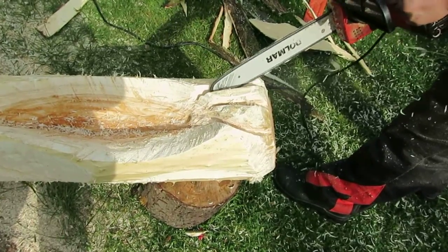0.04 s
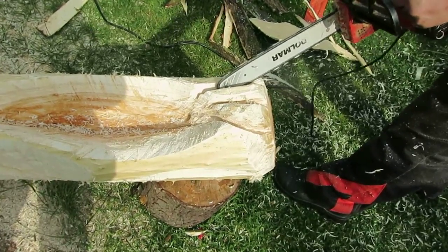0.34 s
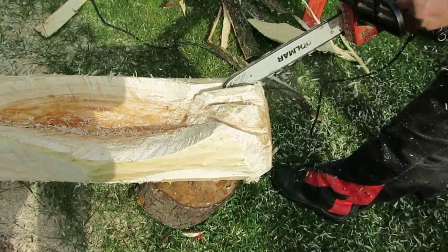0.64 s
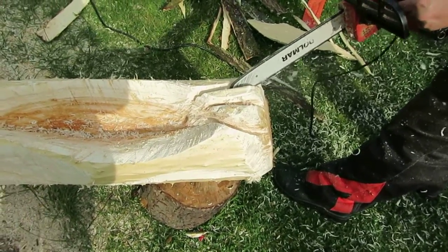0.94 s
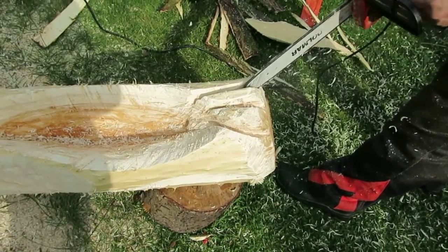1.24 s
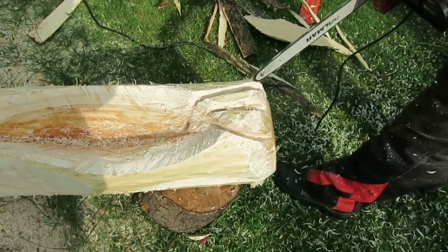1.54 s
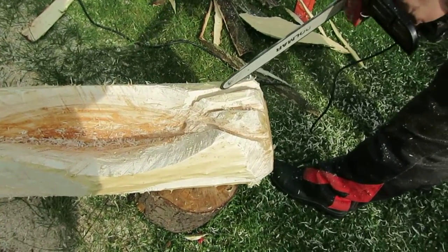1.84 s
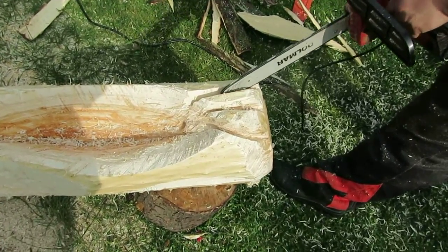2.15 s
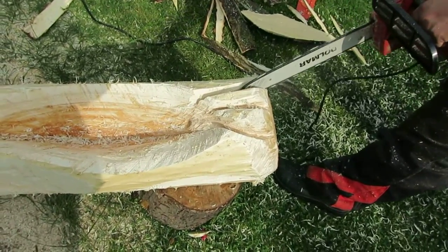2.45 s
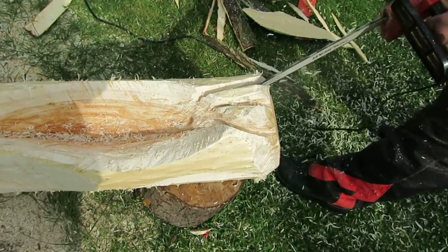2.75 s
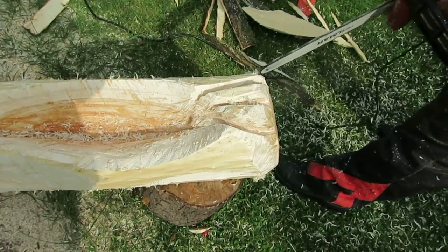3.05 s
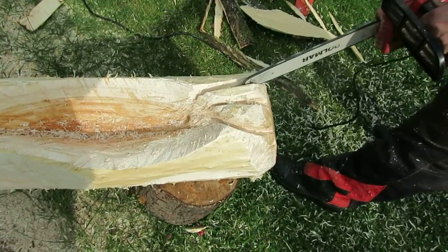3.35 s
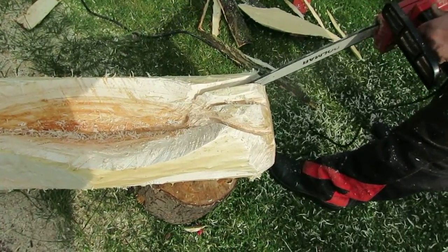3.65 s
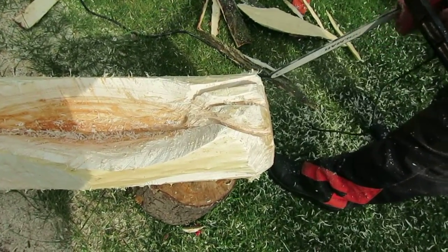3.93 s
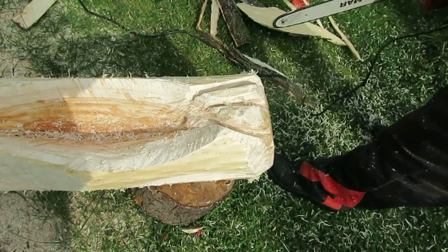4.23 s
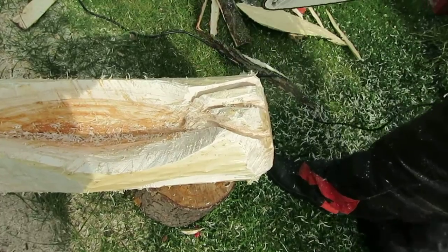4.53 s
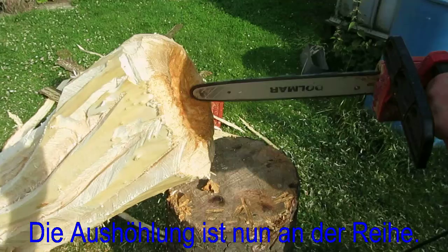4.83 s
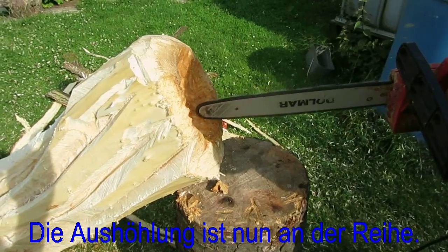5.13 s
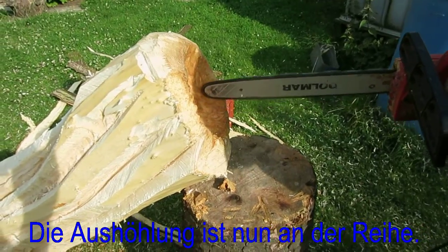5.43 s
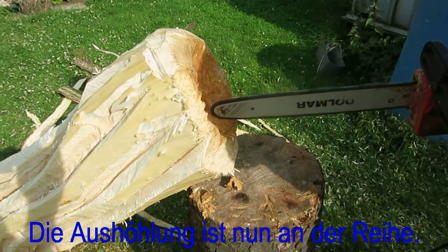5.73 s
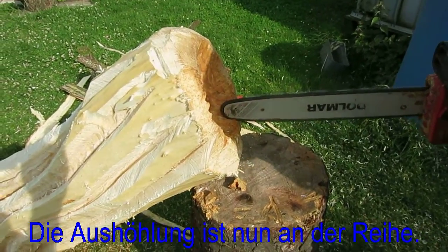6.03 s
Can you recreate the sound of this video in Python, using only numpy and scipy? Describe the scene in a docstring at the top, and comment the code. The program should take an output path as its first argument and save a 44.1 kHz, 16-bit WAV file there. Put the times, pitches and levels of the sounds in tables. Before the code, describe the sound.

A corded chainsaw carves a log outdoors, heard from close by. The motor whines over the clatter of the chain and the bright rasp of cutters in wood, dipping in pitch on the deeper strokes. The trigger is released and the whine falls away. After a very short dead silence, the sawing returns suddenly, high and even in pitch.

```python
"""Electric chainsaw hollowing a log

On a lawn, close to the microphone, a corded saw's whine sags as the chain bites the side of a log.
Links clatter on the sprocket, the bar rings and the cutters rasp. The trigger is let go and the saw
runs down; after a short silence it is at full speed on the end grain."""
import sys
import numpy as np
from scipy import signal
from scipy.fft import rfft, irfft
from scipy.io import wavfile
from scipy.ndimage import uniform_filter1d

SR = 44100
rng = np.random.default_rng(int(sys.argv[2]) if len(sys.argv) > 2 else 0)


def log_audio(samples):
    """Write samples as a 16-bit WAV file to the path given in sys.argv[1]."""
    # one column per channel
    frames = np.atleast_2d(samples).T
    # limit to full scale, then quantise
    limited = np.clip(frames, -1, 1)
    pcm = np.round(limited * 32767).astype(np.int16)
    wavfile.write(sys.argv[1], SR, pcm)


N = 276943
TIME = np.arange(N) / SR
FAN_ORDER, LINKS_PER_TURN, GEAR = 4, 6, 16 / 55
TAUT_SPEED = 400  # motor turns/s below which the chain hangs slack
USUAL_BITE_DB, SINK_S = -19, .07  # SINK_S: time to sink into the groove or lift out
SILENCE_S, BAND_LIMIT_HZ = (4.685, 4.958), 12350

# motor sagging in each side stroke, running down, barely loaded on the end grain: t/s, speed/(turns/s)
SPEED_SIDE = [(0.0, 434.1), (0.44, 407.6), (0.6, 406.1), (1.32, 405.1), (1.65, 431.9), (1.84, 441.2),
              (2.11, 445.2), (2.36, 443.0), (2.53, 429.9), (2.79, 419.5), (2.84, 421.3), (3.08, 437.6),
              (3.26, 443.3), (3.46, 440.3), (3.59, 430.2), (3.79, 429.9), (3.92, 436.0), (3.94, 432.1)]
SPEED_COAST = [(4.11, 367), (4.32, 301), (4.52, 223), (4.69, 145)]
SPEED_END = [(4.96, 442.7), (5.15, 442.7), (5.5, 445.5), (5.7, 442.5), (6.0, 447.2), (6.28, 449.7)]
# how hard the cutters bite on the side and on the end grain: t/s, bite/dB
BITE_SIDE = [(0.0, -19), (0.64, -20.5), (0.69, -19.5), (1.31, -20), (1.46, -23), (1.63, -23), (2.02, -18.5),
             (2.78, -21.5), (2.82, -18.5), (2.85, -25), (2.95, -24.5), (3.25, -20.5), (3.62, -20),
             (3.64, -21.5), (3.82, -22), (3.84, -24.5), (3.94, -23)]
BITE_END = [(4.98, -17), (5.17, -18), (6.02, -17.5), (6.062, -15.5), (6.104, -19), (6.23, -18)]
# the chain runs deep in the wood: start/s, end/s, relative depth
GROOVES = [(.39, 1.37, 2.2), (2.2, 2.65, 0.34), (3.44, 3.77, 0.6)]
# fan whine: t/s, level/dB
FAN_LEVEL = [(0, -25.5), (.5, -29), (1.3, -30.5), (1.72, -26.5), (2.4, -31.5), (2.6, -33.5), (3.25, -29.5),
             (3.6, -32.5), (4.02, -28.5), (4.11, -33.5), (4.69, -41.5), (4.96, -27.5), (5.55, -28.5),
             (6.1, -25.5)]
# weaker motor tones: multiple of shaft speed, level/dB against the fan
SHAFT_TONES = [(1, -25.5), (2, -14), (6, -22.5), (8, -14.5)]
# how strongly the saw radiates a link tone: f/Hz, level/dB
LINK_RESPONSE = [(250, -46), (350, -38), (470, -39), (525, -36), (600, -41), (700, -31.5), (735, -41),
                 (775, -36.5), (900, -39.5), (1280, -43), (1420, -33.5), (1560, -29.5), (1700, -29.5),
                 (1850, -45), (2300, -39.5)]
# link tones: harmonic, change/dB per groove depth, change/dB on end grain, change/dB per speed halving
LINK_TONES = [(1, -8.5, 9.5, -7.5), (2, -16.5, -2, -1), (3, 1.5, -5, -0.5)]
# weaker chain tones against the rasp: multiple of sprocket speed, side level/dB, end-grain level/dB
SPROCKET_TONES = [(3.008, -30.5, -28), (5.02, -26.5, -23), (7.41, -23, -32), (9.07, -23.5, -32),
                  (10.95, -21, -18), (12.87, -21, -24), (15, -21, -27), (24.37, -21.5, -19.5),
                  (30.03, -23, -17.5), (35.6, -20.5, -12.5), (41.7, -26.5, -25.5)]
# noise under load: side level/dB, end-grain level/dB, then change/dB per dB of bite,
# per groove depth and per speed halving
HOUSING_LAW = (-31.5, -30.5, .5, -0.1, -5.5)
BAR_LAW = (-32.5, -34, -0.05, -0.5, -2)
RASP_LAW = (-22.5, -24, 0.77, 0.2, -9.5)
HISS_LAW = (-19.5, -20, 1.08, 0.1, -10.5)
# noise spectra at the microphone, saw on the side or the end grain: f/Hz, relative level/dB
HOUSING_SIDE = [(20, -11), (100, -13), (220, -11), (350, -9.5), (480, -10), (640, -3.5), (760, -9.5),
                (910, -0.5), (1150, -4.5), (1330, -4.5), (1600, -23), (2500, -56.5)]
HOUSING_END = [(20, -9), (100, -7), (300, -6.5), (480, -4), (680, 1), (790, -2), (900, 0.5), (1200, 0),
               (1350, -0.5), (1600, -11), (2500, -60)]
RASP_SIDE = [(900, -51.5), (1600, -9), (2000, -3), (2400, -3), (3300, -6), (4200, -3), (4900, -1),
             (5700, -1), (6500, -0.5), (7500, -5.5), (10000, -45)]
RASP_END = [(900, -50), (1600, -8.5), (2000, -4), (2400, -2), (3200, -3.5), (4200, -2), (4900, 0.5),
            (5700, -0.5), (6500, 0), (7500, -14), (10000, -45)]
HISS_SPECTRUM = [(4000, -49.5), (6000, -17.5), (6900, -4.5), (7600, -0.5), (8600, 1), (10200, 1),
                 (10800, -2.5), (11300, -7), (11800, -18), (12300, -26.5), (14000, -66.5)]
# guide bar modes: f/Hz, width/Hz, relative level/dB
BAR_MODES = [(1444, 150, -1), (1570, 300, 0.5), (1762, 140, -2)]
# passing resonances of housing, bar and log: start/s, end/s, f/Hz, width/Hz, level/dB
SAW_AND_WOOD_RINGS = [(0, 1.352, 966, 260, -37), (0, 0.296, 920, 150, -42), (0, 1.35, 301, 60, -49),
                      (0.179, 0.233, 948, 50, -29.5), (0.327, 0.478, 957, 180, -36),
                      (1.447, 2.5, 643, 70, -42.5), (1.596, 2.198, 1545, 200, -32.5),
                      (2.68, 2.75, 926, 60, -33.5), (2.66, 2.86, 1490, 90, -32),
                      (2.7, 2.86, 2360, 200, -38), (3.259, 3.577, 5200, 1600, -27),
                      (3.45, 3.802, 320, 70, -46.5), (3.55, 4.099, 680, 160, -44),
                      (3.87, 3.94, 3770, 60, -36), (5.68, 6.28, 4930, 900, -30.5)]
# spells of chatter: start/s, end/s, gain/dB, voice (0 squeal, 1 knock, 2 growl)
CHATTER_SPELLS = [(0.288, 1.35, -51, 0), (0.253, .9, -47, 2), (2.17, 2.515, -36.5, 2),
                  (2.49, 2.803, -40, 2), (2.68, 2.79, -38.5, 0), (2.775, 2.86, -28, 0),
                  (3.35, 3.62, -58, 2), (3.61, 3.754, -36.5, 1)]
# chatter partials: multiple of sprocket speed, relative level/dB in a squeal, a knock, a growl
CHATTER_TONES = [(2.494, -31.5, -2.5, -18.5), (2.986, -20, -10.5, -6), (5.6, -32, -1.5, -33),
                 (7.39, -13, -19, -9.5), (8.97, -21, 0, 0), (12.04, 5, 2, -20), (15, -15, 4.5, -10),
                 (18.05, -8, 1, -7.5), (19.5, 0.5, 1, -10.5), (22.7, -18, 3, -23.5),
                 (24.2, -3.5, -2, -22.5), (36.3, -7, -11, -24)]
# a faint, thin high tone gliding upward: t/s, f/Hz, level/dB
HIGH_GLIDE = [(4.1, 8070, -52), (4.14, 8530, -30), (4.18, 9050, -31.5), (4.24, 9800, -34),
              (4.29, 10270, -55)]


def gain_of(db):
    """Decibels to a factor."""
    return 10 ** (np.asarray(db) / 20)


def unit_rms(x):
    """Scales to rms 1."""
    return x / np.sqrt(np.mean(x ** 2) + 1e-20)


def curves(rows):
    """Each column after the first as a curve over time."""
    times, *columns = np.transpose(rows)
    return [np.interp(TIME, times, column) for column in columns]


def shaped(x, spectrum):
    """Colours x with a spectrum, at rms 1."""
    hz, db = np.transpose(spectrum)
    bins_hz = np.fft.rfftfreq(N, 1 / SR)
    response = gain_of(np.interp(np.log(bins_hz + 1), np.log(hz), db))
    return unit_rms(irfft(rfft(x) * response, N))


def drift(rate_hz):
    """A random wander of rms 1."""
    knots = rng.standard_normal(N // 20)
    return unit_rms(np.interp(TIME * rate_hz, np.arange(len(knots)), knots))


def tone(turns, flutter_db):
    """A sine on a running phase, with a fluttering level."""
    sine = np.sqrt(2) * np.sin(2 * np.pi * (turns + rng.random()))
    return sine * unit_rms(gain_of(flutter_db * drift(45)))


def swell(start, end):
    """A rounded arch between two times."""
    progress = np.clip((TIME - start) / (end - start), 0, 1)
    return 2 * np.sqrt(progress * (1 - progress))


def resonate(x, hz, width):
    """A resonance applied twice, for steep skirts."""
    b, a = signal.iirpeak(hz, hz / width, fs=SR)
    return signal.lfilter(b, a, signal.lfilter(b, a, x))


def impacts(links, spread_db, decay, steady):
    """Each link gives a burst of its own size (decay in link periods) over steady sliding noise."""
    link_index = (links - links.min() // 1).astype(int)
    sizes = gain_of(spread_db * np.clip(rng.standard_normal(N // 20), -2.3, 2.3))
    bursts = unit_rms(sizes[link_index] * np.exp(-(links % 1) / decay))
    return rng.standard_normal(N) * np.sqrt(bursts ** 2 + steady ** 2)


def motor(shaft):
    """The cooling fan whines over weaker shaft tones."""
    fan_db, = curves(FAN_LEVEL)
    weaker = sum(gain_of(db) * tone(order * shaft, flutter_db=1) for order, db in SHAFT_TONES)
    return gain_of(fan_db) * (tone(FAN_ORDER * shaft, flutter_db=.37) + weaker)


def link_tones(links, speed, end_grain, depth, halvings):
    """Links drop onto the sprocket in step; their tones swell as they pass the saw's resonances."""
    hz, db = np.transpose(LINK_RESPONSE)
    link_hz = LINKS_PER_TURN * GEAR * speed
    sound = np.zeros(N)
    for harmonic, groove_db, end_db, halving_db in LINK_TONES:
        radiated_db = np.interp(np.log(harmonic * link_hz), np.log(hz), db)
        change_db = groove_db * depth + end_db * end_grain + halving_db * halvings
        sound += gain_of(radiated_db + change_db) * tone(harmonic * links, flutter_db=1.5)
    return sound


def sprocket_tones(sprocket, end_grain):
    """Unlike links and teeth add weaker tones around those of the links."""
    return sum(gain_of(np.where(end_grain, end_db, side_db)) * tone(order * sprocket, flutter_db=3)
               for order, side_db, end_db in SPROCKET_TONES)


def housing_clatter(links, slap, end_grain):
    """Links knock on the sprocket and sound through the housing."""
    knocks = slap * impacts(links, spread_db=.5, decay=.4, steady=.76)
    return np.where(end_grain, shaped(knocks, HOUSING_END), shaped(knocks, HOUSING_SIDE))


def cutter_rasp(links, chips, end_grain):
    """Cutters tear out chips, with one colour along the side and another on the end grain."""
    cuts = chips * impacts(links, spread_db=2, decay=.56, steady=1.6)
    return np.where(end_grain, shaped(cuts, RASP_END), shaped(cuts, RASP_SIDE))


def cutter_hiss(links, chips):
    """The biting cutters hiss high up, pulsing with each link."""
    return chips * shaped(impacts(links, spread_db=2, decay=.31, steady=1.18), HISS_SPECTRUM)


def bar_ring(links):
    """Link impacts ring the steel guide bar in a few damped modes."""
    modes = (gain_of(db) * resonate(impacts(links, spread_db=5, decay=.24, steady=.45), hz, width)
             for hz, width, db in BAR_MODES)
    return unit_rms(sum(modes))


def saw_and_wood_rings(links):
    """The chain excites passing resonances of housing, bar and log, in the cut or running free."""
    blows = impacts(links, spread_db=6.5, decay=.21, steady=.56)
    return sum(gain_of(db) * swell(start, end) * unit_rms(resonate(blows, hz, width))
               for start, end, hz, width, db in SAW_AND_WOOD_RINGS)


def chatter(sprocket):
    """The cutters bounce in the groove in step with the chain."""
    orders, *voice_dbs = np.transpose(CHATTER_TONES)
    partials = np.array([tone(order * sprocket, flutter_db=2.5) for order in orders])
    voices = gain_of(voice_dbs) @ partials
    return sum(gain_of(db) * swell(start, end) * voices[round(voice)]
               for start, end, db, voice in CHATTER_SPELLS)


def high_glide():
    """A faint, thin high tone glides upward, separate from the saw."""
    hz, db = curves(HIGH_GLIDE)
    sounding = (TIME > HIGH_GLIDE[0][0]) & (TIME < HIGH_GLIDE[-1][0])
    turns = np.cumsum(hz + 20 * drift(280)) / SR
    return sounding * gain_of(db) * tone(turns, flutter_db=0)


def scene():
    """The saw from close by, in mono: one shaft speed drives fan, sprocket and chain."""
    end_grain = TIME > np.mean(SILENCE_S)
    speed, = curves([*SPEED_SIDE, *SPEED_COAST, *SPEED_END])
    release_s, release_speed = SPEED_SIDE[-1]
    coasting = (TIME > release_s) & ~end_grain
    halvings = coasting * np.log2(release_speed / speed)
    depth = sum(deep * np.clip(np.minimum(TIME - start, end - TIME) / SINK_S + .5, 0, 1)
                for start, end, deep in GROOVES)
    bite_db = curves([*BITE_SIDE, *BITE_END])[0] - USUAL_BITE_DB

    def level(law):
        """A noise's gain as it follows bite, groove depth and falling speed."""
        side_db, end_db, per_bite, groove_db, halving_db = law
        base_db = np.where(end_grain, end_db, side_db)
        return gain_of(base_db + per_bite * bite_db + groove_db * depth + halving_db * halvings)

    slack = np.clip(1 - speed / TAUT_SPEED, 0, 1)
    shaft = np.cumsum(speed * (1 + .0005 * drift(25))) / SR  # angle in turns
    sprocket = GEAR * shaft + (.002 + .031 * slack) * drift(70)  # a slack chain jerks
    slap = gain_of(slack * (4.7 * drift(130) - .5))  # and meets the sprocket unevenly
    links = LINKS_PER_TURN * sprocket
    chips = unit_rms(gain_of(.4 * drift(110)))  # chips vary in size
    saw = motor(shaft)
    saw += slap * link_tones(links, speed, end_grain, depth, halvings)
    saw += slap * level(RASP_LAW) * sprocket_tones(sprocket, end_grain)
    saw += level(HOUSING_LAW) * housing_clatter(links, slap, end_grain)
    saw += level(RASP_LAW) * cutter_rasp(links, chips, end_grain)
    saw += level(HISS_LAW) * cutter_hiss(links, chips)
    saw += level(BAR_LAW) * bar_ring(links)
    return (saw + saw_and_wood_rings(links) + chatter(sprocket) + high_glide())[None]


def record(dry):
    """Peaks rounded off and top treble cut at the microphone; between the two scenes, a brief silence over a
    faint noise floor."""
    rounded = dry / (1 + (dry / .72) ** 6) ** (1 / 6)
    audible = (TIME < SILENCE_S[0]) | (TIME > SILENCE_S[1])
    gate = uniform_filter1d(audible.astype(float), size=24)
    floor_spectrum = [(5, 0), (30, -22.5), (100, -31), (1000, -45), (12000, -50.5)]  # f/Hz, level/dB
    floor = gain_of(-92.5) * shaped(rng.standard_normal(N), floor_spectrum)
    lowpass = signal.firwin(511, BAND_LIMIT_HZ, window=("kaiser", 9), fs=SR)
    return signal.oaconvolve(rounded * gate + floor, lowpass[None], "same")


dry = scene()
out = record(dry)
log_audio(out)
```